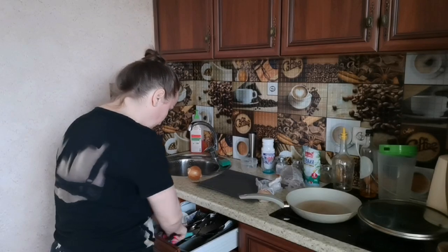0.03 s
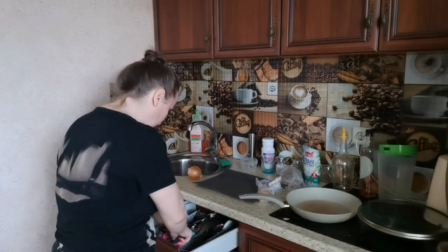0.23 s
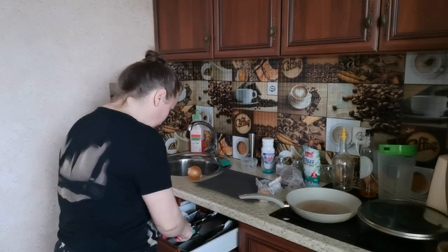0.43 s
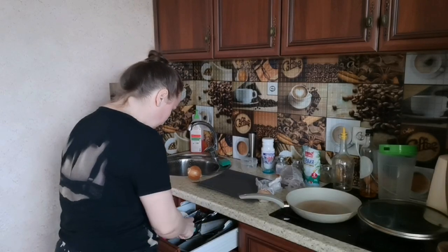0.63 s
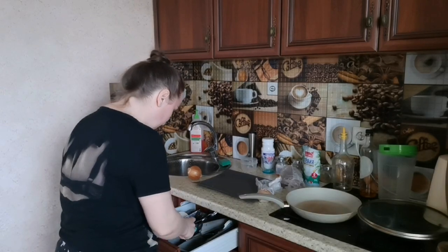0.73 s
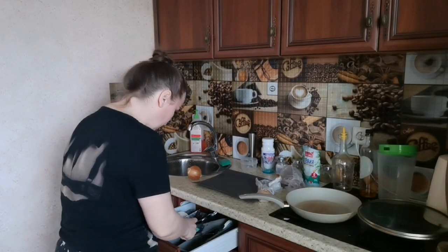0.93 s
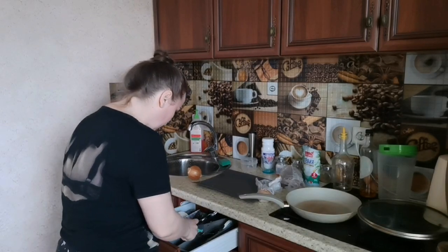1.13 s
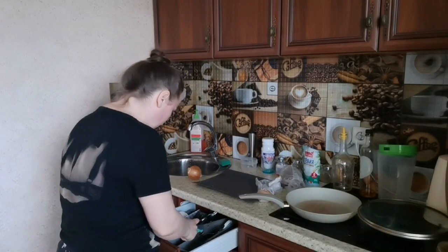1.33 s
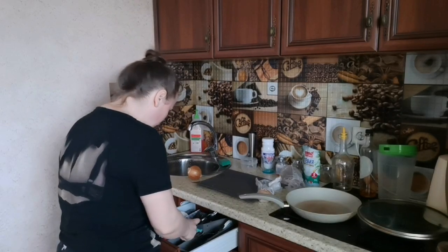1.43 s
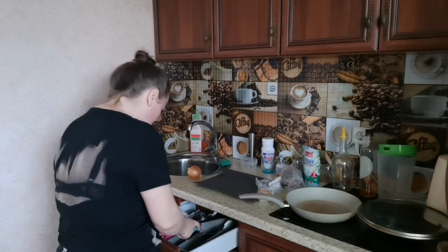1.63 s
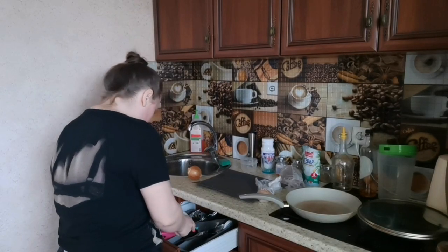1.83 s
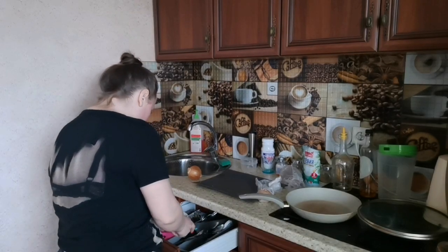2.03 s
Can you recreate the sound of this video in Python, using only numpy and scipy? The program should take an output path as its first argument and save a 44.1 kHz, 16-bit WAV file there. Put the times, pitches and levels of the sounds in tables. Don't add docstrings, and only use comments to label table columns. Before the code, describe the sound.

Metal cutlery is rummaged in a kitchen drawer, a few steps from the microphone. After near quiet, a loud clatter with dull knocks and a low cabinet boom runs from 0.17 to 0.6 seconds. A lull follows, with a faint tick near 0.98. Rattling, scraping and ringing clinks return from 1.09 to 1.85, then a soft clink at 2.05. Short hard-room echo, faint fridge hum.

```python
import sys
import numpy as np
from scipy import signal
from scipy.fft import rfft, irfft
from scipy.io import wavfile
from scipy.ndimage import uniform_filter1d

SR = 44100
rng = np.random.default_rng(int(sys.argv[2]) if len(sys.argv) > 2 else 0)


def undo_db(level):
    steps = np.asarray(level, float) / 20
    return 10 ** steps


def unload_audio(sound):
    columns = np.transpose(np.atleast_2d(sound))
    steps = np.round(np.clip(columns, -1, 1) * 32767)
    wavfile.write(sys.argv[1], SR, steps.astype(np.int16))


N = 92610

RISE_S = 0.001275


def evened(x):
    return x / np.sqrt(np.mean(x ** 2) + 1e-20)


def read(points, hz):
    f, value = np.transpose(points)
    return np.interp(np.log(hz + 1), np.log(f + 1), value)


def add(mix, s, sound):
    part = mix[round(s * SR):][:len(sound)]
    part += sound[:len(part)]


def resonate(x, hz, width):
    return signal.lfilter(*signal.iirpeak(hz, hz / width, SR), x)


def floor():
    # (frequency [Hz], density [dB per Hz])
    air_spectrum = [(30, -7.5), (75, -13), (130, -4), (300, -7), (650, -6.5), (1000, -13.5), (5100, -30.5),
                    (15500, -38)]
    # (frequency [Hz], likeness [0-1])
    likeness = [(30, 0.03), (150, 0.54), (400, 0.66), (1000, 0.08), (8000, 0)]
    # (frequency [Hz], width [Hz], level [dB])
    fridge_modes = [(59.7, 17, -65), (103.4, 4.1, -68), (215, 14.4, -67), (283.5, 2.2, -75),
                    (572, 3.5, -67), (940, 2.3, -78), (3870, 640, -74.5), (4900, 37, -82.5)]
    air_db = -57.5

    hz = np.fft.rfftfreq(N, 1 / SR)
    a, b = rfft(rng.standard_normal((2, N)))
    same = np.clip(read(likeness, hz), 0, 1)
    pair = np.array([a, same * a + np.sqrt(1 - same ** 2) * b])
    air = irfft(pair * undo_db(read(air_spectrum, hz)), N)

    seed = rng.standard_normal(N)
    hum = sum(undo_db(db) * evened(resonate(resonate(seed, f, width), f, width))
              for f, width, db in fridge_modes)
    return undo_db(air_db) * evened(air) + hum


def echoes():
    # (frequency [Hz], t60 [s])
    kitchen_decay = [(100, 0.11), (300, 0.43), (1000, 0.5), (4000, 0.41), (8000, 0.34), (14000, 0.25)]
    tail_db, early_db, left_db = 4, -4.5, 0.3
    direct_db = -5.5

    taps = np.zeros((2, SR))
    at = np.arange(100, SR - 20, 20) + rng.integers(0, 20, (2, (SR - 101) // 20))
    np.put_along_axis(taps, at, rng.choice([-1., 1.], at.shape), 1)

    hz, t, z = signal.stft(taps, SR, nperseg=256)
    decay = undo_db(-60 * t / read(kitchen_decay, hz)[:, None])
    tail = signal.istft(z * decay, SR, nperseg=256)[1][:, :SR]
    tail *= undo_db(tail_db) / np.linalg.norm(tail, axis=1, keepdims=True)

    early = rng.integers(40, 900, (2, 7))
    np.put_along_axis(tail, early, undo_db(early_db) * rng.uniform(-0.93, 1, early.shape), 1)
    tail[:, 0] = undo_db(direct_db) * undo_db([left_db, -left_db])
    return tail / np.linalg.norm(tail[0])


def kitchen(x, count=4):
    shift_s, mono_hz = 0.07, 604
    place = np.arange(N) / SR / shift_s
    left, right = 0, 0
    for k in range(count):
        distance = abs((place - k + count / 2) % count - count / 2)
        share = np.clip(1 - distance, 0, 1)
        wet = signal.fftconvolve((x * share)[None], echoes(), axes=1)[:, :N]
        left, right = left + wet[0], right + wet[1]
    side = signal.lfilter(*signal.butter(2, mono_hz, "high", fs=SR), left - right) / 2
    return (left + right) / 2 + np.array([side, -side])


def thuds():
    # (time [s], level [dB], pitch [Hz])
    shoves = [
        (0.19, -46, 105),
        (0.29, -35, 215),
        (0.426, -46.5, 105),
        (1.388, -45, 112),
        (1.668, -49, 105),
        (1.758, -65, 105),
    ]
    rise_s, t60_s = 0.032, 0.49
    t, out = np.arange(SR // 2) / SR, np.zeros(N)
    swell = np.sin(np.pi / 2 * np.minimum(t / rise_s, 1)) ** 2
    for s, db, hz in shoves:
        add(out, s, undo_db(db - 60 * t / t60_s) * swell * np.sin(2 * np.pi * hz * t))
    return out


def stroke(length, size):
    release_s = 0.0087
    t = np.arange(size) / SR
    return np.minimum(t / RISE_S, 1) * np.exp(-np.maximum(t - length, 0) / release_s)


def contacts(per_s, spread_db):
    size = undo_db(spread_db * np.minimum(rng.exponential(1, N), 4))
    hit = rng.random(N) < per_s / SR
    return evened(size * hit * rng.choice([-1., 1.], N))


def struck(train, s, length):
    blow, blow_s = 28.2, 0.044
    part = train[round(s * SR):][:SR // 4].copy()
    part[round(RISE_S * SR)] += blow * np.exp(-length / blow_s)
    return part


def drawer():
    # (time [s], level [dB], length [s], pitch [Hz])
    bumps = [(0.165, -26.5, 0.003, 920), (0.171, -33, 0.037, 550), (0.217, -25, 0.048, 630),
             (0.267, -32.5, 0.0042, 950), (0.2698, -28, 0.0017, 1060), (0.291, -36, 0.035, 417),
             (0.35, -36.5, 0.14, 583), (0.523, -36.5, 0.085, 670), (0.98, -56.5, 0.028, 860),
             (1.084, -40, 0.014, 1250), (1.13, -37, 0.032, 900), (1.155, -28.5, 0.046, 735),
             (1.204, -38, 0.037, 413), (1.289, -36, 0.092, 590), (1.374, -33, 0.006, 1320),
             (1.375, -30, 0.0036, 1460), (1.386, -37, 0.078, 545), (1.537, -45, 0.0029, 615),
             (1.579, -41.5, 0.027, 1260), (1.621, -38.5, 0.052, 950), (1.661, -35.5, 0.068, 910),
             (1.72, -35, 0.068, 540), (1.832, -45, 0.047, 495), (1.996, -54.5, 0.054, 830),
             (2.069, -49, 0.021, 1520)]
    # (frequency [Hz], width [Hz], level [dB])
    box_modes = [(105, 12, -40), (209, 8.6, 0.5), (274, 4.7, 4.5), (352, 2.3, -48), (429, 11, 3),
                 (536, 19, -7.2), (614, 26, -0.5), (650, 8.1, -22), (799, 23, -9.5), (903, 22, -6),
                 (964, 28, -9), (1213, 210, -8.5), (1247, 33, -19), (1560, 48, -6.5)]
    box_db = 6

    train, push = contacts(per_s=900, spread_db=1.5), np.zeros(N)
    for s, db, length, hz in bumps:
        part = struck(train, s, length)
        width = 1.68 * hz
        dull = resonate(resonate(part, hz, width), hz, width)
        add(push, s, undo_db(db) * evened(dull) * stroke(length, size=len(part)))
    box = sum(undo_db(db) * resonate(push, hz, width) for hz, width, db in box_modes)
    return push + undo_db(box_db) * box


def clinks(table):
    wobble, wobble_s = 0.25, 0.004
    detune = 0.004
    t, out = np.arange(SR // 2) / SR, np.zeros((2, N))
    noise = rng.standard_normal((len(table), len(t)))
    rough = wobble * evened(uniform_filter1d(noise, round(wobble_s * SR)))
    phases = rng.uniform(-1.18, 1, (len(table), 2))
    for (s, hz, db, t60), phase, r in zip(table, phases, rough):
        envelope = undo_db(db - 60 * t / t60) * np.minimum(t / RISE_S, 1)
        for channel, p in zip(out, phase):
            ring = np.sin(2 * np.pi * hz * t + p)
            if t60 < 0.5:
                twin = np.sin(2 * np.pi * hz * (1 + detune) * t - p) / np.pi
                ring = ring + r * ring + twin
            add(channel, s, envelope * ring)
    return out


def cutlery(count=24):
    # (time [s], level [dB], length [s], brightness [dB per octave])
    slides = [(0.165, -30, 0.016, 1), (0.211, -25.5, 0.067, -6.5), (0.259, -37.5, 0.012, -3.5),
              (0.345, -34, 0.074, -7.5), (0.379, -48.5, 0.022, 12), (0.406, -39, 0.0024, 8.5),
              (0.426, -39, 0.084, 4), (0.5272, -32.5, 0.023, -9.5), (0.541, -35.5, 0.011, 5.5),
              (0.569, -29.5, 0.036, -3.1), (0.624, -59, 0.041, -14), (0.949, -56, 0.0074, -5),
              (0.9832, -48.5, 0.0062, -0.5), (1.092, -37.5, 0.035, -4), (1.136, -39.5, 0.012, 6),
              (1.1525, -24.5, 0.0095, -3.5), (1.161, -37, 0.025, -5), (1.181, -41.5, 0.095, 7.5),
              (1.255, -26, 0.055, -0.5), (1.324, -37.5, 0.042, 4.5), (1.364, -27, 0.026, -2),
              (1.421, -37, 0.034, -4.5), (1.569, -61, 0.013, -12), (1.606, -43.5, 0.032, -5),
              (1.619, -34.5, 0.026, 1), (1.649, -29, 0.021, 0), (1.681, -25.5, 0.049, 0.5),
              (1.745, -29, 0.041, -2), (1.809, -50, 0.095, -0.5), (2.052, -48.5, 0.0036, 1.5)]
    # (frequency [Hz], level [dB])
    steel_colour = [(600, -21), (2700, -5), (4800, -3.5), (5600, -9.5), (9000, -12), (12300, -11),
                    (13300, -17), (15600, -20)]
    tick_db, tick_top_hz = 5.5, 13000
    piece_t60_s, mode_spread_db = 0.0087, -11.5

    train, piece = contacts(per_s=3000, spread_db=2.0), rng.integers(0, count, N)
    push, t, out = np.zeros(N), np.arange(SR // 5) / SR, np.zeros(N)
    for s, db, length, tilt_db in slides:
        part = struck(train, s, length) * stroke(length, size=SR // 4)[:N - round(s * SR)]
        hz = np.fft.rfftfreq(len(part), 1 / SR)
        tilt = undo_db(tilt_db * np.log2((hz + 500) / 4000))
        add(push, s, undo_db(db) * irfft(rfft(part) * tilt, len(part)))

    last_tick = np.maximum.accumulate(np.where(train != 0, np.arange(N), 0))
    owner = piece[last_tick]
    for k, (u, v, w) in enumerate(rng.random((count, 3, 7))):
        hz = 1500 + 13500 * u ** 1.3
        t60 = piece_t60_s * (0.5 + 0.64 * v)
        decay = undo_db(mode_spread_db * (w - 0.5)[:, None] - 60 * t / t60[:, None])
        ring = (decay * np.sin(2 * np.pi * hz[:, None] * t)).sum(0)
        out += signal.oaconvolve(push * (owner == k), ring / np.linalg.norm(ring))[:N]

    out += undo_db(tick_db) * signal.lfilter(*signal.butter(4, tick_top_hz, fs=SR), push)
    return irfft(rfft(out) * undo_db(read(steel_colour, np.fft.rfftfreq(N, 1 / SR))), N)


def scene():
    # (time [s], frequency [Hz], level [dB], t60 [s])
    ringing_pieces = [(.27, 7354, -37.5, 0.2), (.226, 3560, -41, 0.12), (0.267, 1180, -24, .09),
                      (0.409, 9720, -41, 0.35), (.545, 11100, -43, .16), (.55, 3720, -36.5, 0.36),
                      (.692, 6630, -60, 0.3), (0.955, 8800, -64.5, 0.063), (.9837, 8400, -66, .1),
                      (1.089, 1250, -34.5, 0.083), (1.092, 2837, -43, 0.4), (1.09, 4350, -55, 0.1),
                      (1.089, 6826, -56, .1), (1.109, 11500, -56, 0.26), (1.135, 11300, -40.5, 0.082),
                      (1.262, 11750, -44, 0.35), (1.275, 4280, -38, 0.12), (1.3765, 1620, -25, 0.055),
                      (1.373, 1180, -25, .06), (1.4, 9895, -47, 0.6), (1.602, 3085, -49, 0.63),
                      (1.68, 3000, -32, 0.13), (1.965, 12050, -78, 0.45), (.167, 528, -29, 0.27),
                      (0.168, 1189, -26, 0.089), (1.155, 636, -30.5, 0.18), (2.053, 3811, -44, 0.2),
                      (2.056, 5426, -53, 0.25), (2.055, 7440, -57, 0.15)]
    # (time [s], frequency [Hz], level [dB], t60 [s])
    close_taps = [(.184, 543, -31, 0.25), (.217, 520, -28, 0.084), (.232, 578, -21, 0.063),
                  (.253, 524, -29, .08), (.273, 677, -23.5, 0.088), (.28, 1160, -26, 0.06),
                  (.268, 3800, -37, .12), (.275, 2360, -36, 0.088), (.23, 4750, -35, 0.09),
                  (.29, 899, -26.5, .12), (.541, 3430, -34, .08), (.545, 4685, -40.5, 0.41),
                  (.66, 1560, -45.5, 0.22), (1.16, 3610, -33, 0.12), (1.178, 1150, -32, 0.037),
                  (1.19, 530, -46, 0.14), (1.2, 4640, -40, 0.092), (1.26, 493, -46, 0.053),
                  (1.278, 531, -39.5, 0.36), (1.285, 2283, -31, 0.13), (1.28, 4450, -44, 0.1),
                  (1.295, 4460, -35.5, 0.1), (1.34, 3150, -33, .08), (1.363, 3850, -34, 0.088),
                  (1.385, 543, -30.5, 0.12), (1.43, 590, -35, 0.061), (1.66, 960, -36.5, 0.11),
                  (1.715, 611, -34.5, 0.063), (1.76, 740, -37.5, 0.25), (1.79, 572, -45, 0.17),
                  (1.72, 4470, -46, .15), (2.054, 4200, -53, .06), (2.056, 2202, -50, 0.22),
                  (2.056, 1164, -50.5, 0.26), (2.0535, 3700, -47, .1), (2.07, 4280, -55, .3),
                  (1.157, 691, -30.5, 0.17), (1.166, 623, -40, 0.2), (1.185, 385, -35, 0.083),
                  (1.215, 542, -33, 0.094), (1.235, 441, -33.5, 0.14), (1.3775, 1450, -27, 0.024),
                  (.196, 590, -30, .15), (.2715, 1300, -22, 0.035), (.56, 3700, -35, 0.22),
                  (1.695, 4300, -41, 0.086), (2.052, 10500, -52, .05), (2.052, 11900, -57, .05)]
    ring_echo_db, mic_low_hz = -16.0, 129

    rings = clinks(ringing_pieces)
    clatter = drawer() + cutlery() + undo_db(ring_echo_db) * rings[0]
    clatter = signal.lfilter(*signal.butter(3, mic_low_hz, "high", fs=SR), clatter)
    return kitchen(clatter) + rings + thuds() + floor() + clinks(close_taps)


def low_pass(x):
    return signal.sosfilt(signal.butter(12, 15990, fs=SR, output="sos"), x)


def record(dry):
    edge_hz = 15700
    limited = irfft(rfft(dry) * (np.fft.rfftfreq(N, 1 / SR) < edge_hz), N)
    return low_pass(limited)


dry = scene()
out = record(dry)
unload_audio(out)
```